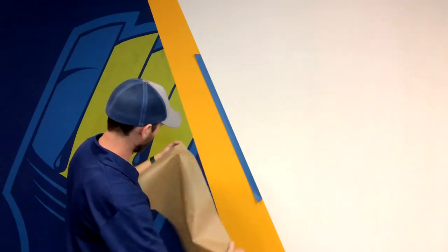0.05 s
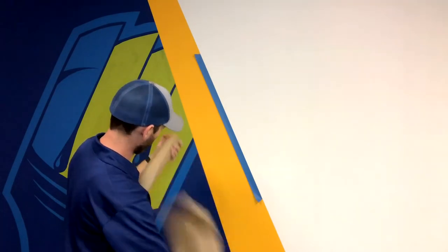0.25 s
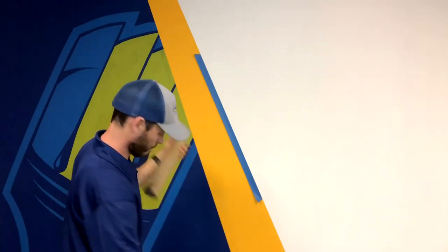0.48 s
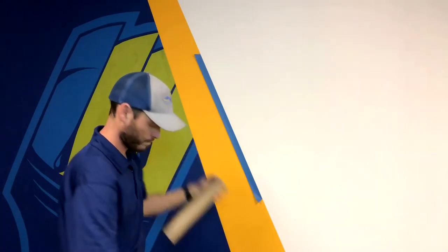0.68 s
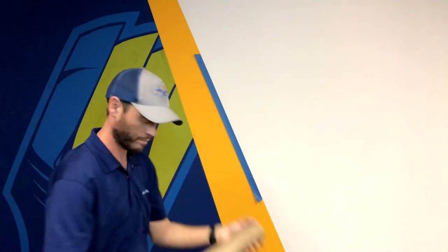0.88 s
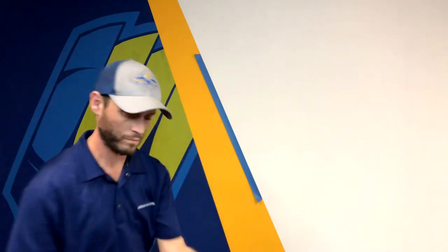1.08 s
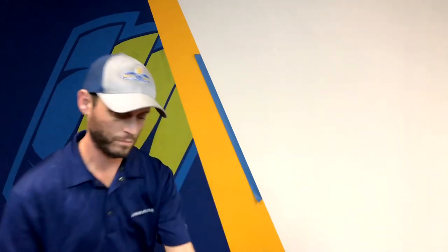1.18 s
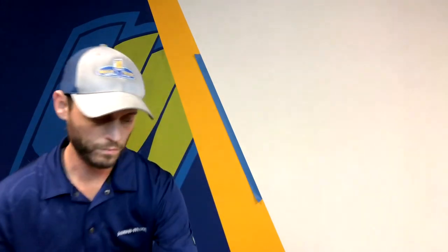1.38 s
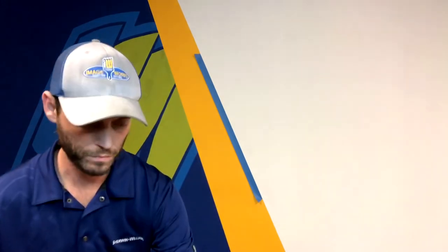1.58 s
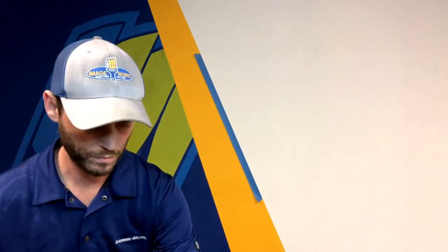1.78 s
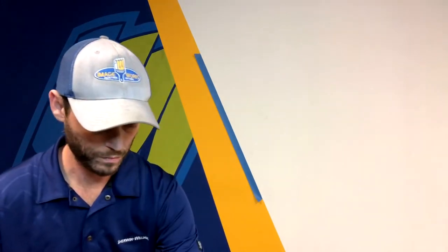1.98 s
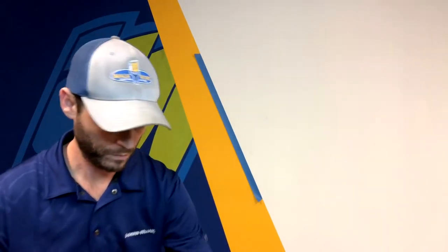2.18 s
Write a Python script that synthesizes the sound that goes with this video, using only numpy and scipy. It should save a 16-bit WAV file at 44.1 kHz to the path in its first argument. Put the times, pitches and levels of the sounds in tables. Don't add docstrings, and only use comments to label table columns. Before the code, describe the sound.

Close microphone in a lively indoor room with faint hum and hiss: crisp paper creases, a short rip, quiet rustling, then a double-ended woody knock as the paper roll is set down, and small crackles.

```python
import sys
import numpy as np
from scipy import signal
from scipy.io import wavfile
from scipy.ndimage import uniform_filter1d

SR = 44100
rng = np.random.default_rng(int(sys.argv[2]) if len(sys.argv) > 2 else 0)


def volts_from_decibels(level):
    exponent = np.asarray(level, float) / 20
    return 10 ** exponent


def unload_wav(signal):
    wavfile.write(
        sys.argv[1],
        SR,
        np.round(np.clip(np.atleast_2d(signal).T, -1, 1) * 32767).astype(np.int16),
    )


N = 97020


def rip():
    # time_s, level_db
    tearing = [
        (.21, -35),
        (.214, -29),
        (.229, -17),
        (.236, -12.5),
        (.29, -19),
        (.33, -19),
        (.37, -42),
        (.42, -78),
    ]
    # frequency_hz, density_db (dB per Hz)
    fibre_colour = [(59, -39), (100, -32.5), (210, -13.5), (389, -16.5), (491, -13), (2170, -8.5),
                    (4370, -0.5), (11400, -5), (15900, -13.5)]
    edge_hz, edge_wander, edge_width_hz, edge_db = 4167, 0.45, 1100, -12.5

    speed = follow(tearing)
    fibres = clicks(rate=15000, spread_db=1.5) * volts_from_decibels(0.6 * wander(size=100))
    pitch_hz = edge_hz * (1 + edge_wander * wander(size=300))
    fibres = fibres + volts_from_decibels(edge_db) * evened(resonate(fibres, pitch_hz, edge_width_hz))
    bright = np.clip(speed / speed.max(), 0, 1) ** 0.74
    fast = colour(fibres, fibre_colour)
    slow = colour(fibres, fibre_colour, tilt_db=-2.0)
    return speed * (bright * fast + (1 - bright) * slow)


def snaps():
    # start_s, level_db, fade_s (to -60
    # dB), tilt_db (dB per octave)
    creases = [(0.001, -27.5, 0.085, 3.5), (.012, -27.5, 0.036, 7.5), (.052, -24.5, 0.073, 3.3),
               (0.102, -26.5, .03, 6.5), (.109, -28.5, 0.061, 10), (.545, -37.5, .05, 11),
               (0.712, -37.5, 0.15, 0), (1.013, -58, 0.012, -14), (1.056, -38, 0.032, -2),
               (1.098, -44, .03, -0.5), (1.139, -50.5, 0.036, 14), (1.263, -46, 0.062, -4),
               (1.41, -44, 0.01, 0), (1.413, -42.5, 0.1, 2), (1.222, -50, .02, -8.5),
               (1.384, -49.5, .03, -4), (1.523, -46, 0.014, 0.4), (1.549, -42, 0.086, -3),
               (1.573, -42.5, 0.1, -3), (1.59, -33.5, 0.12, 3.9), (1.64, -45.5, .15, 0.5),
               (1.613, -26.5, 0.075, -6), (1.8103, -38, 0.09, -4.5), (1.914, -43.5, 0.16, -3),
               (1.95, -48.5, 0.028, -5), (1.283, -42.5, 0.061, -3.5), (.957, -53.5, 0.071, 5),
               (2.126, -50.5, 0.14, 3.5), (2.192, -34, 0.016, -2)]
    # frequency_hz, density_db (dB per Hz)
    pop_colour = [(120, -41), (250, -15.5), (520, -8.5), (1640, -2.5), (3750, 0), (7000, -6.5),
                  (11000, -14), (15900, -25.5)]
    rise_share, pop_share, pop_s, shiver_db = 0.06, 0.6, 0.008, 1.5

    t = np.arange(9000) / SR
    out = np.zeros(N + len(t))
    for start_s, level_db, fade_s, tilt_db in creases:
        noise = rng.standard_normal(len(t))
        body = np.minimum(t / (rise_share * fade_s), 1) * volts_from_decibels(-60 * t / fade_s)
        pop = pop_share * volts_from_decibels(-60 * t / pop_s)
        shiver = volts_from_decibels(shiver_db * evened(uniform_filter1d(noise[::-1], size=120)))
        snap = colour(noise * (body + pop) * shiver, pop_colour, tilt_db)
        out[round(start_s * SR):][:len(t)] += volts_from_decibels(level_db) * snap
    return out[:N]


def rustle():
    # time_s, level_db
    handling = [(0, -37.5), (.03, -40.5), (.12, -47.5), (.19, -44), (.5, -42.5), (.72, -51), (.84, -59.5),
                (.92, -50.5), (.96, -48), (1.09, -49), (1.2, -54), (1.25, -56), (1.28, -46), (1.4, -58),
                (1.53, -55.5), (1.9, -58.5), (2.05, -92), (2.2, -75)]
    # frequency_hz, density_db (dB per Hz)
    crinkle_colour = [(59, -7), (100, -7.5), (177, -15), (215, -2.5), (365, -3.5), (451, -4), (1720, -1.5),
                      (4010, -1.5), (15900, -29)]
    crinkles = clicks(rate=2400, spread_db=3.5) * volts_from_decibels(1.5 * wander(size=250))
    return colour(crinkles * follow(handling, after_db=-75), crinkle_colour)


def knock():
    # start_s, contact_s, table_db, layers_db, core_db
    blows = [
        (1.586, 0.0012, -9.5, -14.5, -34),
        (1.5928, .0006, -35, -8.5, -17),
        (1.603, 0.00072, -33, -9.5, -18),
        (1.6106, 0.0005, -15.5, -6, -2.5),
        (1.619, 0.0012, -16, -5.5, -28.5),
        (1.626, 0.00077, -25, -15.5, -22),
        (1.641, .002, -16, -45.5, -44.5),
        (1.694, .0006, -32, -27.5, -31.5),
        (1.81, 0.00078, -40, -63, -44),
    ]
    # frequency_hz, level_db, t60_s
    table_modes = [(70, -7, 0.13), (95.6, -9, 0.12), (128.6, -4, 0.094), (165.5, -11.5, 0.23),
                   (226.7, 8, 0.068), (224.7, -6.5, 0.33), (260.8, -9.5, 0.29), (290, -17.5, .55),
                   (318.7, -15, 0.67), (335.3, -21, 0.62)]
    # frequency_hz, level_db, t60_s
    layer_modes = [(369, -5.5, 0.051), (478, -2, 0.043), (523.5, -2.5, 0.088), (612, 2, 0.03),
                   (739, -17, 0.33), (564, -16.5, 0.1), (832, -27, 0.4)]
    # frequency_hz, level_db, t60_s
    core_modes = [(905, -1, 0.039), (1008, -0.5, .03), (1290, -4.5, 0.015), (1580, -28, .03)]

    t = np.arange(SR // 2) / SR
    out = np.zeros(N + SR)
    bodies = np.array([ring(table_modes, t), ring(layer_modes, t), ring(core_modes, t)])
    for start_s, contact_s, *shares_db in blows:
        push = np.sin(np.pi * np.clip(t[:300] / contact_s, 0, 1)) ** 2
        ringing = volts_from_decibels(np.array(shares_db)) @ bodies
        blow = signal.fftconvolve(ringing, push / push.sum())[:len(t)]
        out[round(start_s * SR):][:len(t)] += blow
    return out[:N]


def ring(modes, t):
    rise_cycles = 1.47
    total = np.zeros(len(t))
    for k, (hz, db, t60) in enumerate(modes):
        swell = 1 - np.exp(-t * hz / rise_cycles)
        total += (-1) ** k * volts_from_decibels(db - 60 * t / t60) * swell * np.sin(2 * np.pi * hz * t)
    return total


def room(x):
    # frequency_hz, t60_s
    decay = [(100, .6), (400, 0.44), (1040, 0.59), (2760, 0.67), (7280, 0.56), (15000, .3)]
    first_echo_s, spacing, turns_hz = 0.0052, 20, 7

    out = np.zeros(N)
    slots = np.arange(0, SR - spacing, spacing)
    for k in range(3):
        place = slots + rng.integers(0, spacing, len(slots))
        onset = np.clip(place / SR / first_echo_s - 1, 0, 1)
        taps = np.zeros(SR)
        taps[place] = rng.choice([-1., 1.], len(slots)) * onset
        hz, t, bands = signal.stft(taps, SR, nperseg=256)
        fading = bands * volts_from_decibels(-60 * t / read(decay, hz)[:, None])
        tail = signal.istft(fading, SR, nperseg=256)[1]
        share = np.sqrt(2 / 3) * np.cos(np.pi * (np.arange(N) / SR * 2 * turns_hz + k / 3))
        out += signal.fftconvolve(x * share, tail / np.linalg.norm(tail))[:N]
    return out


def air():
    # frequency_hz, density_db (dB per Hz)
    hiss_colour = [(30, -24.5), (60, 2.3), (200, 0.5), (600, -7), (1200, -4), (4000, -8), (8000, -15.5),
                   (15900, -27)]
    return volts_from_decibels(-61.0) * colour(rng.standard_normal(N), hiss_colour)


def clicks(rate, spread_db):
    happens = rng.random(N) < rate / SR
    size = volts_from_decibels(spread_db * np.minimum(rng.exponential(1, N), 5))
    return evened(rng.choice([-1., 1.], N) * size * happens)


def wander(size):
    smooth = uniform_filter1d(rng.standard_normal(N), size=size)
    return evened(uniform_filter1d(smooth, size=size))


def resonate(x, hz, width):
    carrier = np.exp(2j * np.pi * np.cumsum(hz) / SR)
    r = np.exp(-np.pi * width / SR)
    return 2 * (carrier * signal.lfilter([1 - r], [1, -r], x / carrier)).real


def colour(x, points, tilt_db=0.):
    hz = abs(np.fft.fftfreq(4096, 1 / SR))
    gain_db = read(points, hz) + tilt_db * np.log2((hz + 50) / 4000)
    log_gain = np.log(volts_from_decibels(gain_db))
    taps = np.fft.ifft(np.exp(np.conj(signal.hilbert(log_gain)))).real[:2048]
    return signal.oaconvolve(x, taps / np.linalg.norm(taps))[:len(x)]


def read(points, hz):
    f, value = np.transpose(points)
    return np.interp(np.log(hz + 1), np.log(f + 1), value)


def follow(curve, after_db=-150):
    s, db = np.transpose(curve)
    return volts_from_decibels(np.interp(np.arange(N) / SR, s, db, -150, after_db))


def evened(x):
    return x / np.sqrt(np.mean(x ** 2) + 1e-20)


def scene():
    hang_hz, hang_width_hz, hang_db, slack_s = 1670, 118, 3.5, 0.22
    paper_room_db, knock_room_db = -1.65, -16

    paper = snaps() + rustle()
    thud = knock()
    taut = paper * np.clip(1 - (np.arange(N) / SR / slack_s) ** 2, 0, 1)
    hang = volts_from_decibels(hang_db) * resonate(taut, np.full(N, hang_hz), hang_width_hz)
    paper = paper + rip() + hang
    echoes = room(volts_from_decibels(paper_room_db) * paper + volts_from_decibels(knock_room_db) * thud)
    mono = paper + thud + echoes + air()
    return np.array([mono, mono])


def top_cut(x):
    return signal.sosfilt(signal.butter(12, 16090, fs=SR, output="sos"), x)


def record(dry):
    # frequency_hz, gain_db
    capsule = [(30, 5), (600, -2.5), (1100, 2), (3000, -1.1), (7000, 0.5), (8000, 0.5), (8800, -2.5),
               (16000, -0.5)]
    low_hz, limit, top_hz = 55, 2.5, 15850

    x = np.array([colour(channel, capsule) for channel in dry])
    x = signal.sosfilt(signal.butter(2, low_hz, "high", fs=SR, output="sos"), x)
    x = limit * np.tanh(x / limit)
    low_pass = signal.firwin(1023, top_hz, window=("kaiser", 9), fs=SR)
    mix = signal.oaconvolve(x, low_pass[None], "same")
    return top_cut(mix)


dry = scene()
out = record(dry)
unload_wav(out)
```